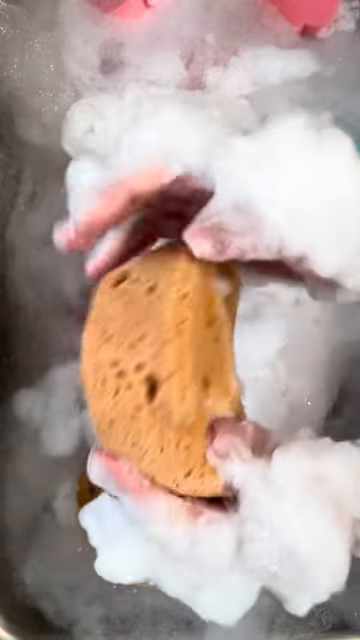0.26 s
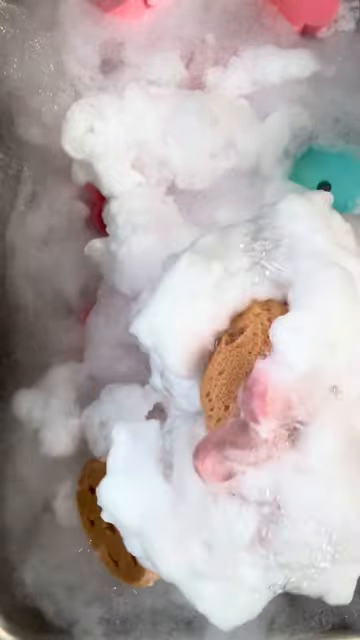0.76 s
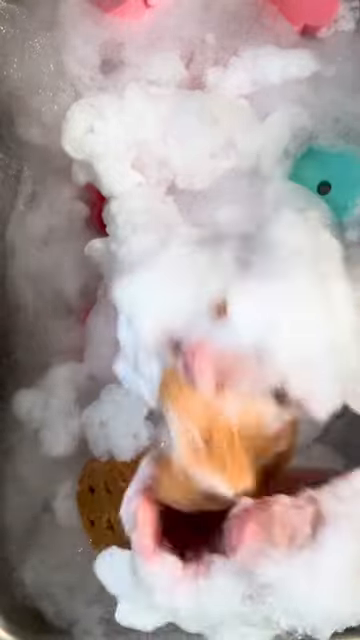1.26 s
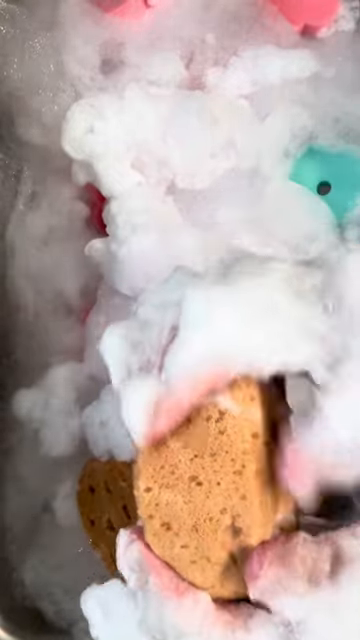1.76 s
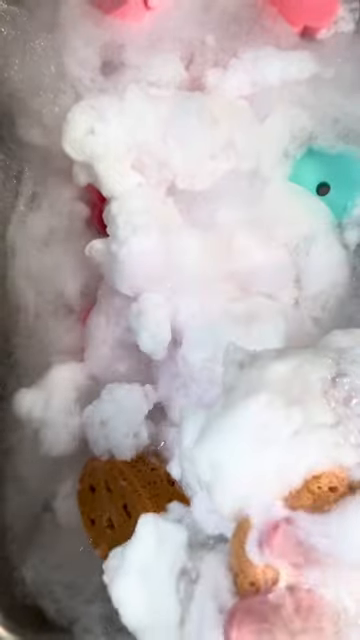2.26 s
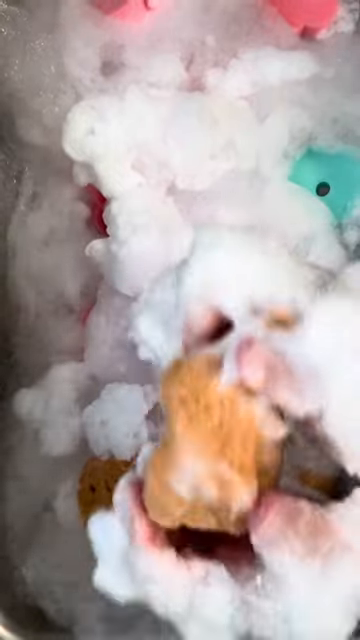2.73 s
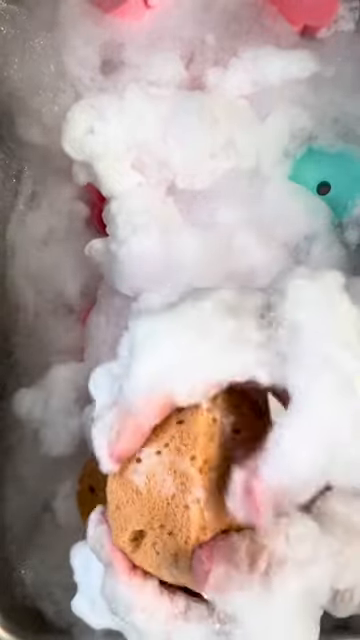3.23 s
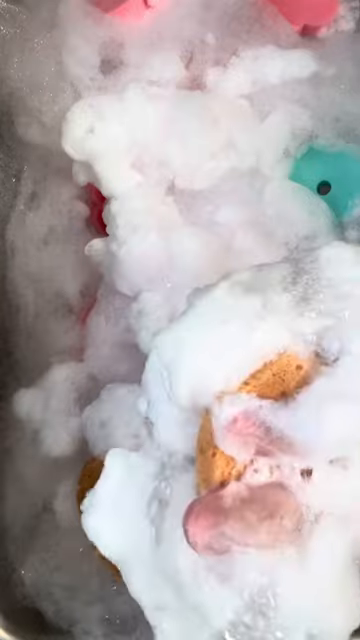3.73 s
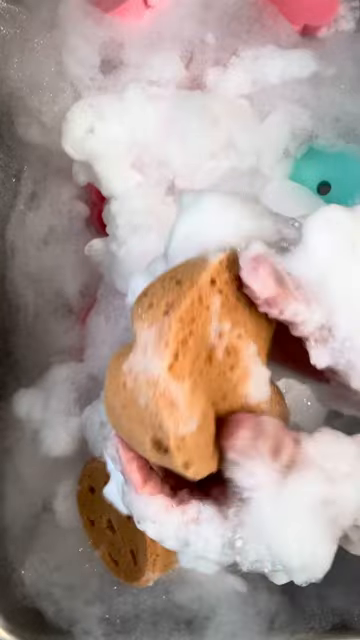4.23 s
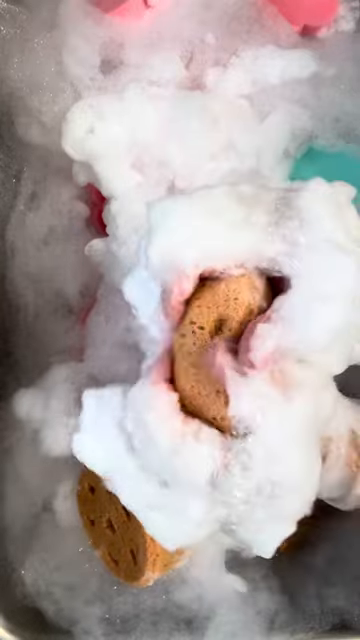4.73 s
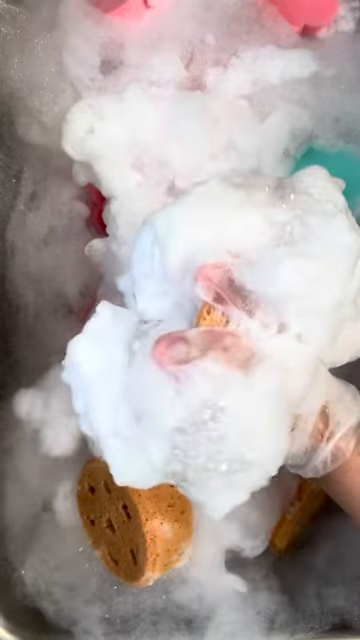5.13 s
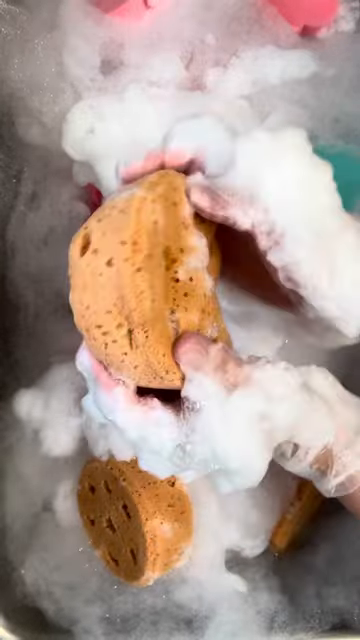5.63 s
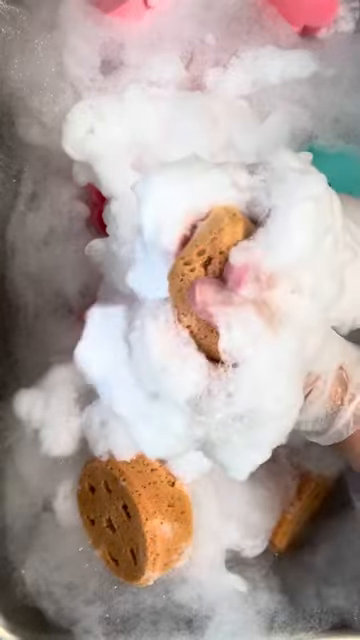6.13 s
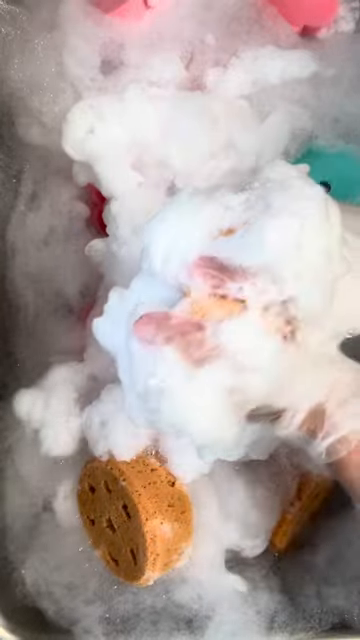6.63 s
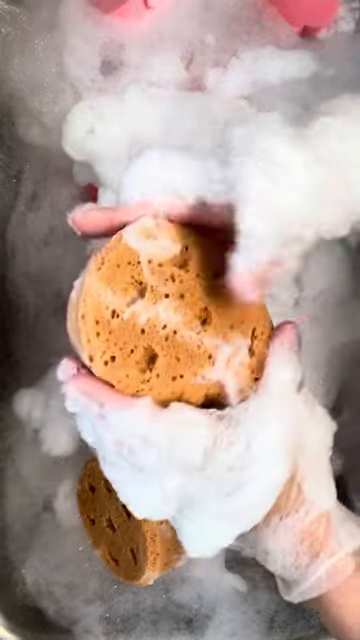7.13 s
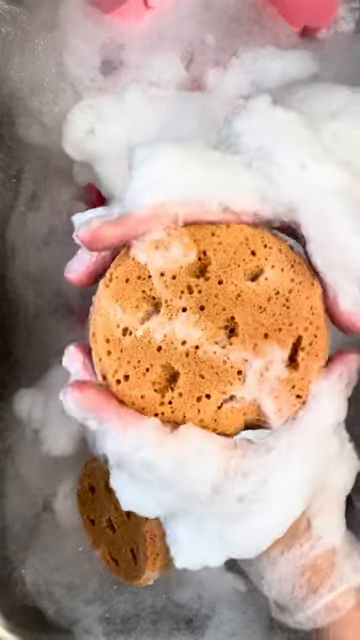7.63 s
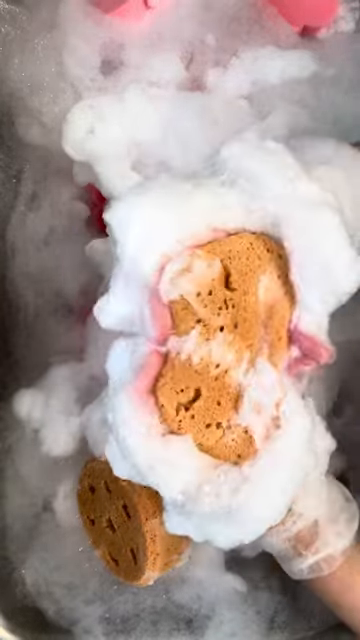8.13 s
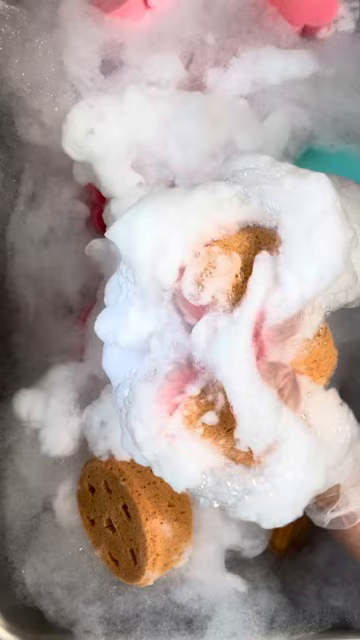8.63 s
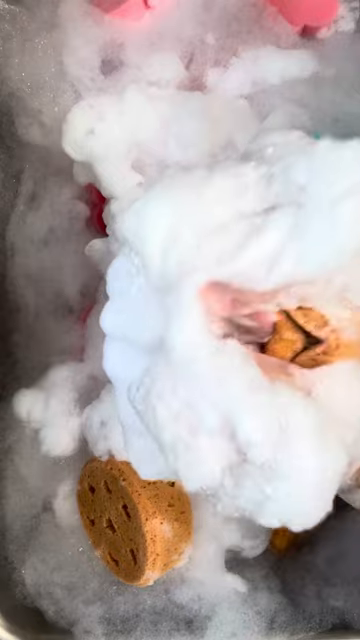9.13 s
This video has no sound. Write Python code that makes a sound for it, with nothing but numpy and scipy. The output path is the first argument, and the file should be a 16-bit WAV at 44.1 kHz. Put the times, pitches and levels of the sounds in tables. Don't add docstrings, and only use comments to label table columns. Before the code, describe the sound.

Gloved hands squeeze a soapy sponge again and again over a foam-filled steel sink, wet squelches, fizz and pops, ending in a stuttering, burping wring.

```python
import sys
import numpy as np
from scipy import signal
from scipy.fft import rfft, irfft, next_fast_len
from scipy.io import wavfile
from scipy.ndimage import uniform_filter1d

SR = 44100
rng = np.random.default_rng(int(sys.argv[2]) if len(sys.argv) > 2 else 0)


def voltage_ratio(decibels):
    exponent = np.asarray(decibels, float) / 20
    return 10 ** exponent


def persist_wave(psi):
    counts = np.round(np.clip(psi, -1, 1) * 32767).astype(np.int16)
    wavfile.write(sys.argv[1], SR, np.atleast_2d(counts).T)


N = 413658
HZ = np.fft.rfftfreq(next_fast_len(N + 8192), 1 / SR) + 1e-3

# fizz_db, squelch_db, slosh_db
REST_DB = (-71.5, -59, -59)
# start_s, length_s, fizz_db, squelch_db, slosh_db
SQUEEZES = [(0.523, 0.57, -42, -34.5, -40.5), (1.8, 0.71, -44.5, -37, -45.5), (3.207, 0.69, -43, -36, -39),
            (4.599, 0.63, -47, -38, -40), (5.845, 0.9, -45.5, -39, -42.5)]
# length_share, fizz_db, squelch_db, slosh_db
GRIP = [
    (-0.12, -27, -25, -22),
    (0, -17, -21, -16),
    (0.14, -11, -12.5, -14.5),
    (0.28, -7.5, -5, 0.5),
    (0.5, -2, -2, -5.5),
    (0.72, 1, -5.5, -9.5),
    (0.88, -4, -10.5, -12),
    (1.0, -17.5, -30, -35),
]
# time_s, fizz_db, squelch_db, slosh_db
WRING = [(7.6, -87, -72, -55), (7.75, -63, -58, -56), (7.94, -56, -51, -55), (8.22, -49, -47.5, -50),
         (8.42, -49, -51.5, -59), (8.5, -48.5, -49.5, -45.5), (8.72, -52.5, -45, -36),
         (9.24, -48, -41.5, -37), (9.38, -68, -48.5, -49)]
# peak_s, length_s, fizz_db, squelch_db
RUBS = [(0.018, 0.11, -54.5, -58), (0.1, 0.09, -67, -46), (0.16, 0.065, -54, -64),
        (0.264, 0.083, -60.5, -61), (0.438, 0.039, -57.5, -54.5), (1.215, 0.077, -47, -44),
        (1.343, 0.16, -53.5, -53), (1.514, 0.24, -59.5, -53), (1.74, 0.13, -56.5, -56),
        (2.627, 0.094, -49, -45), (2.76, 0.1, -55, -68), (2.847, 0.2, -79, -51.5),
        (2.959, 0.061, -58.5, -53.5), (3.086, 0.059, -52.5, -70), (4.012, 0.084, -46.5, -42),
        (4.115, 0.12, -52, -52.5), (4.27, 0.12, -56, -47), (4.455, 0.13, -61, -52.5),
        (5.29, 0.17, -53.5, -47.5), (5.43, 0.077, -51.5, -62), (5.593, 0.12, -59, -48),
        (6.737, 0.18, -52, -44.5), (6.98, 0.15, -59.5, -50), (7.196, 0.36, -65, -63), (7.39, .03, -60, -68),
        (7.57, 0.053, -96, -51.5), (7.688, 0.043, -59, -50.5), (0.813, 0.12, -57, -33),
        (2.212, 0.035, -52, -32), (6.153, 0.065, -63, -37)]
# time_s, rumble_db
ARMS = [(0.0, -65), (0.71, -65), (0.78, -55), (0.94, -64.5), (1.91, -62.5), (2.16, -49.5), (2.38, -63.5),
        (4.83, -63), (4.91, -45.5), (5.07, -62.5), (6.11, -64), (6.24, -51), (6.32, -63), (6.45, -50),
        (6.55, -61), (8.36, -68.5), (9.12, -51.5), (9.38, -61)]
# freq_hz, density_db_per_hz
RUMBLE = [(25, -18), (45, -9.5), (80, 6), (110, -2), (200, -22), (500, -23)]
# time_s, rms_db
HUM = [(0, -99), (2.45, -83), (2.6, -61.5), (3.3, -57), (3.55, -53.5), (7, -55.5), (9.38, -54)]
# freq_hz, density_db_per_hz
COARSE = [(300, -6), (1000, -3), (2200, -1), (3500, -2), (5000, -11.5), (7000, -25), (10000, -31.5)]
# freq_hz, density_db_per_hz
FINE = [(1000, -39), (3000, -7), (5000, 0.5), (7000, 0), (10000, -2), (13000, -7.5), (16000, -10)]
# time_s, lift_db
CRISP = [(0, -1), (2.7, -0.5), (3.5, -0.5), (5.8, 1.5), (6.5, -1.5), (7.1, 1.5), (7.6, -3), (8.0, 4),
         (8.4, 3.5), (8.7, 1), (9.38, -14)]
# pitch_hz, level_db
PORES = [(350, -19.5), (500, -7), (700, -2.5), (950, 3), (1300, -6), (2000, -5.5), (2600, -6.5),
         (4500, -12)]
# time_s, peak_db, pitch_hz, crack_db
POPS = [(0.1, -35, 760, -15), (0.766, -24, 568, -16), (0.79, -27, 583, -9), (0.863, -19.5, 700, -6.5),
        (0.913, -25.5, 640, -6.5), (0.933, -31, 587, -18), (2.189, -23, 1020, -5), (2.235, -27, 700, -5),
        (2.309, -26, 1110, -9), (2.35, -15.5, 763, -15), (2.464, -31.5, 930, -1), (3.381, -36, 965, -6),
        (3.498, -25, 690, -17), (3.535, -27, 736, -11), (3.574, -27, 700, -16), (3.683, -20, 710, -28),
        (4.023, -29, 680, -6.5), (4.786, -32, 791, -11.5), (4.952, -22.5, 706, -15),
        (4.999, -21.5, 750, -23), (5.019, -22.5, 710, -16), (6.228, -31, 1146, -11), (6.35, -29, 1250, -6),
        (6.419, -26, 775, -12), (2.213, -26, 1880, -7), (2.252, -21.5, 610, -10), (0.831, -28, 751, -10),
        (0.875, -22, 800, -16), (6.17, -24, 1110, -7), (4.894, -32, 590, -4)]
# time_s, pop_db, burp_db
STUTTER = [(8.463, -25.5, -34), (8.53, -38.5, -54), (8.553, -34, -37), (8.594, -33, -31), (8.641, -37, -33),
           (8.675, -33, -32), (8.708, -32.5, -36), (8.729, -40, -31), (8.75, -35, -29), (8.799, -37, -45),
           (8.838, -31.5, -49), (8.872, -30, -35), (8.889, -37, -46), (8.907, -32, -28),
           (8.929, -29.5, -29), (8.956, -30.5, -26), (8.981, -30, -25), (9.008, -26.5, -27),
           (9.031, -31, -26), (9.055, -32, -19.5), (9.082, -28.5, -32), (9.104, -26, -34),
           (9.144, -22, -34), (9.199, -21.5, -24.5), (9.244, -26, -31), (9.277, -30, -28.5),
           (9.334, -31, -37)]
# time_s, pop_db, burp_db
SPUTTER = [(6.5, -31, -39), (6.554, -33, -37), (6.611, -32, -35), (6.648, -31, -35), (6.675, -34, -34.5),
           (6.7, -31.5, -35), (6.72, -36, -40), (6.757, -39, -43), (6.779, -35, -45)]
# time_s, peak_db, pitch_hz
GULPS = [(0.95, -39.5, 135), (2.005, -35, 203), (2.34, -39, 139), (0.62, -41, 171), (3.4, -36, 183),
         (6.279, -35, 138), (6.429, -39.5, 141)]
# time_s, peak_db, pitch_hz
BUMPS = [(2.815, -43, 50), (4.09, -47, 52)]
# time_s, peak_db, pitch_hz
SLURP = [(2.826, -44, 1010), (2.833, -40, 890), (2.848, -39.5, 620), (2.864, -46, 686), (2.873, -45, 614)]
# freq_hz, width_hz, gain_db
BASIN = [(333.4, 26, 6.5), (440, 23, -0.5), (574, 14.5, 6), (700, 150, 3.5), (869, 37, -8.5),
         (1020, 22, 2.5), (1148, 43, 6.5), (1380, 180, 6), (1542, 38, 6), (1705, 68, 7), (1910, 153, 8),
         (2078, 49, 9), (2250, 15, -7), (2546, 48, 10), (2960, 20, 6.5)]
# freq_hz, phase_rad
LEFT_LAG = [(0, 0), (600, -.17), (1700, .06), (4000, .15), (5100, 1.0), (8000, 3.14), (11800, 6.28),
            (15300, 9.42)]
# freq_hz, gain_db
LEFT_LOUDER = [(600, 0), (900, 1.3), (1500, -.9), (2600, 1.9), (5000, 1.0), (8000, .1)]
# freq_hz, power_share
DIRECT = [(100, .9995), (250, .99), (600, .97), (900, .84), (2100, .89), (2700, .35), (3900, .9),
          (4700, .68), (6500, .75), (8000, .9), (10000, .7), (12000, .88), (13700, .6)]
# low_hz, high_hz, gain_db
MID_GAPS = [(7000, 8850, -20), (14650, 17000, -26)]
# low_hz, high_hz, gain_db
SIDE_GAPS = [(0, 170, -9), (11000, 13050, -25), (3550, 4300, -5.5)]


def rms_one(x):
    return x / np.sqrt(np.mean(x ** 2) + 1e-20)


def in_time(rows):
    s, *columns = np.transpose(rows)
    return [np.interp(np.arange(N) / SR, s, c) for c in columns]


def at_hz(points, hz):
    table_hz, value = np.transpose(points)
    return np.interp(np.log(hz), np.log(table_hz), value)


def shaped(x, response):
    size = 2 * (len(HZ) - 1)
    return irfft(rfft(x, size) * response, size)[..., :N]


def drift(rate_hz):
    r = np.exp(-40 * np.pi * rate_hz / SR)
    noise = rng.standard_normal(N // 20 + 3002)
    slow = signal.lfilter([1], [1, -2 * r, r * r], noise)[3000:]
    return np.interp(np.arange(N) / 20, np.arange(len(slow)), rms_one(slow))


def bursts(per_s, spread_db):
    draw = rng.uniform(-1, 1, N)
    hit = np.flatnonzero(np.abs(draw) < per_s / SR)
    size_db = spread_db * np.minimum(rng.exponential(1, N)[hit], 4.5)
    out = np.zeros(N)
    out[hit] = voltage_ratio(size_db) * np.sign(draw[hit])
    return out


def cells(clicks, pitches_hz, gains_db, cycles):
    out, dealt = np.zeros(N), rng.integers(0, len(pitches_hz), N)
    for k, (hz, db) in enumerate(zip(pitches_hz, gains_db)):
        r, w = voltage_ratio(-60 * hz / (cycles * SR)), 2 * np.pi * hz / SR
        own = clicks * (dealt == k) + 1e-18
        out += voltage_ratio(db) * signal.lfilter([0, np.sin(w)], [1, -2 * r * np.cos(w), r * r], own)
    return rms_one(out)


def add(out, s, sound):
    i = round(s * SR)
    out[i:i + len(sound)] += sound[:N - i]


def blip(hz, rise, fall, glide):
    turns = np.arange(round(8 * SR / hz)) * hz / SR
    swell = (1 - np.exp(-turns / rise)) * np.exp(-turns / fall)
    return -swell / swell.max() * np.sin(2 * np.pi * (turns + glide * np.exp(-turns)))


def blips(events, **shape):
    out = np.zeros(N)
    for s, db, hz in events:
        add(out, s, voltage_ratio(db) * blip(hz, **shape))
    return out


def rumble():
    level_db = in_time(ARMS)[0] - 3.0 + 1.5 * drift(7.5)
    return rms_one(shaped(rng.standard_normal(N), voltage_ratio(at_hz(RUMBLE, HZ)))) * voltage_ratio(level_db + 9.0)


def hands():
    rub_rise, rub_edge_db, rub_slosh_db = 0.61, -12.5, -14
    t = np.arange(0, N / SR + .002, .002)
    power = voltage_ratio(2 * np.array(REST_DB))[:, None] + 0 * t
    share, *grip = np.transpose(GRIP)
    for s, length_s, *peaks_db in SQUEEZES:
        at_share = (t - s) / length_s
        power = power + voltage_ratio([2 * (db + np.interp(at_share, share, g, -99, -99))
                             for db, g in zip(peaks_db, grip)])
    when_s, *wring = np.transpose(WRING)
    power = power + voltage_ratio([2 * np.interp(t, when_s, db, left=-99) for db in wring])
    for s, length_s, fizz_db, squelch_db in RUBS:
        loss_db = rub_edge_db * np.maximum((t - s) / length_s, (s - t) / (length_s * rub_rise))
        peaks_db = np.array([[fizz_db], [squelch_db], [squelch_db + rub_slosh_db]])
        power = power + voltage_ratio(2 * (loss_db + peaks_db))
    return in_time(np.vstack([t, 10 * np.log10(power)]).T)


def gush(events, level_db, over_db, empty_s):
    s, db = np.array(events)[:, :2].T
    at = np.round(s * SR).astype(int)
    marks = np.zeros(N)
    marks[at] = np.minimum(voltage_ratio(db - level_db[at] - over_db), 3.5)
    flow = 1 + signal.lfilter([1], [1, -np.exp(-1 / (empty_s * SR))], marks + 1e-18)
    return flow / np.sqrt(uniform_filter1d(flow ** 2, size=4410))


def fizz(fizz_db, squelch_db, spurts):
    patches_db = 1.17 * drift(1.6) + 0.51 * drift(26) + 0.72 * drift(7.3)
    fine_db = at_hz(FINE, HZ)
    colours = voltage_ratio([at_hz(COARSE, HZ), fine_db, np.where(HZ > 7900, fine_db, -200)])
    low_cut = (HZ / (HZ + 100)) ** 2
    coarse, fine, top = shaped(bursts(14000, spread_db=0.0), colours * low_cut)
    fine = (fine + (voltage_ratio(in_time(CRISP)[0]) - 1) * top) / fine.std()
    coarse_db = 0.56 * fizz_db + 0.52 * squelch_db + 4.0
    large = rms_one(coarse) * voltage_ratio(coarse_db) * spurts
    small = fine * voltage_ratio(fizz_db + 4.0) * spurts ** 0.12
    return voltage_ratio(patches_db) * (large + small)


def squelch(level_db, spurts):
    pitches_hz = np.geomspace(400, 3000, 10)
    clicks = bursts(5000 * voltage_ratio(1.5 * drift(30)), spread_db=2.0) * spurts
    return cells(clicks, pitches_hz, at_hz(PORES, pitches_hz), cycles=9.2) * voltage_ratio(level_db - 2.0)


def slosh(level_db):
    pitches_hz = np.geomspace(135, 335, 6)
    clicks = bursts(900 * voltage_ratio(1.1 * drift(16)), spread_db=2.5)
    gurgle = cells(clicks, pitches_hz, -1.5 * np.log2(pitches_hz / 150), cycles=22.6)
    band = signal.butter(2, [115, 380], "band", fs=SR, output="sos")
    return signal.sosfilt(band, gurgle) * voltage_ratio(level_db - 3.0)


def pockets(squelch_db):
    pocket_hz, pocket_spread, suds_hz = 820, 0.28, 696
    small_over_db, small_gate_db = 3, -43.5
    rows = STUTTER + SPUTTER
    stutter = []
    for (s, db, _), (a, b) in zip(rows, rng.standard_normal((40, 2))):
        stutter.append((s, db, suds_hz * np.exp(0.19 * a), -3 + 1.9 * b))
    times_s = np.sort(rng.uniform(0, STUTTER[0][0], size=110))
    small = []
    for s, (a, b, c) in zip(times_s, rng.standard_normal((len(times_s), 3))):
        under_db = squelch_db[round(s * SR)]
        if under_db > small_gate_db:
            hz = pocket_hz * np.exp(pocket_spread * b)
            small.append((s, under_db + small_over_db + 3.2 * a, hz, -10.5 + 4.6 * c))
    return POPS + small, stutter


def pops(events, top_hz):
    out, tear = np.zeros(N), rng.standard_normal((160, 900))
    crack_band = signal.butter(1, [900, top_hz], "band", fs=SR, output="sos")
    t = np.arange(900) / SR
    for (s, db, hz, crack_db), noise in zip(events, tear):
        tearing_s = 0.0074 * voltage_ratio(1.09 * crack_db)
        ring = blip(hz, rise=0.16, fall=1.82, glide=-0.24)
        crack = signal.sosfilt(crack_band, noise * np.exp(-t / tearing_s))
        add(out, s + 0.294 * tearing_s, voltage_ratio(db - 2.5) * ring)
        add(out, s - .0004, voltage_ratio(db + crack_db + 1) * crack)
    return out


def gulps():
    return blips(GULPS, rise=1.2, fall=3.5, glide=0)


def hum():
    hum_hz = 120.9
    phase = 2 * np.pi * hum_hz * np.arange(N) / SR + 0.26 * drift(3.3)
    return np.sqrt(2) * voltage_ratio(in_time(HUM)[0] + 2.0 * drift(0.48)) * np.sin(phase)


def bumps():
    return blips(BUMPS, rise=.8, fall=1.7, glide=0)


def slurp():
    return blips(SLURP, rise=.9, fall=6.3, glide=-.3)


def burps():
    lag_s, burp_hz, sag_hz_per_db = 0.00605, 219, 10
    events = [(s + lag_s, db + .5, burp_hz - sag_hz_per_db * (db + 27)) for s, _, db in STUTTER + SPUTTER]
    suds = blips(events, rise=.35, fall=.5, glide=-.15)
    return signal.sosfilt(signal.butter(2, 80, "high", fs=SR, output="sos"), suds + 1e-18)


def basin():
    return voltage_ratio(sum(db / (1 + (2 * (HZ - hz) / width_hz) ** 2) for hz, width_hz, db in BASIN))


def ports(x):
    scatter_per_s = 103.6
    share = np.clip(at_hz(DIRECT, HZ), 0, 1)
    lag_rad = np.interp(HZ, *np.transpose(LEFT_LAG))
    half = voltage_ratio(at_hz(LEFT_LOUDER, HZ) / 2) * np.exp(-.5j * lag_rad)
    stray = np.sqrt(1 - share)
    paths = np.array([share ** .5 * half, share ** .5 / half, stray, -1j * stray])
    left, right, cosine, sine = shaped(x, basin() * paths)
    turn = np.pi * np.array([drift(scatter_per_s), drift(scatter_per_s)])
    return np.array([left, right]) + cosine * np.cos(turn) + sine * np.sin(turn)


def scene():
    fizz_db, squelch_db, slosh_db = hands()
    events, stutter = pockets(squelch_db)
    spurts = gush(events, squelch_db, over_db=19.0, empty_s=0.0043)
    spurts = spurts * gush(stutter, squelch_db, over_db=11.0, empty_s=0.006)
    sponge = fizz(fizz_db, squelch_db, spurts) + squelch(squelch_db, spurts) + slosh(slosh_db)
    sponge += pops(events, top_hz=4470) + pops(stutter, top_hz=6200)
    sponge += gulps() + bumps() + slurp() + burps()
    return ports(sponge) + rumble() + hum()


def band_gaps(gaps):
    return voltage_ratio(sum(db * ((HZ > low_hz) & (HZ < high_hz)) for low_hz, high_hz, db in gaps))


def low_pass(x):
    return signal.sosfilt(signal.butter(12, 15730, fs=SR, output="sos"), x)


def record(dry):
    left, right = dry
    bass = 1 / (1 + np.sqrt(2) * 45 / (1j * HZ) - (45 / HZ) ** 2)
    mid_side = np.array([left + right, left - right]) / 2
    mid, side = shaped(mid_side, bass * np.array([band_gaps(MID_GAPS), band_gaps(SIDE_GAPS)]))
    return low_pass(np.array([mid + side, mid - side]))


dry = scene()
out = record(dry)
persist_wave(out)
```